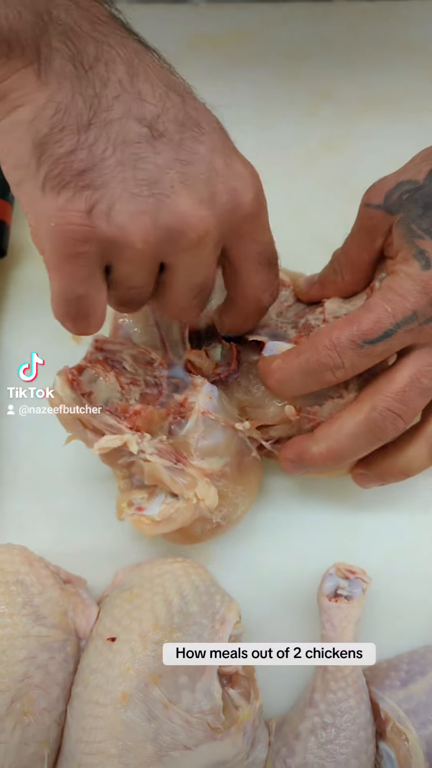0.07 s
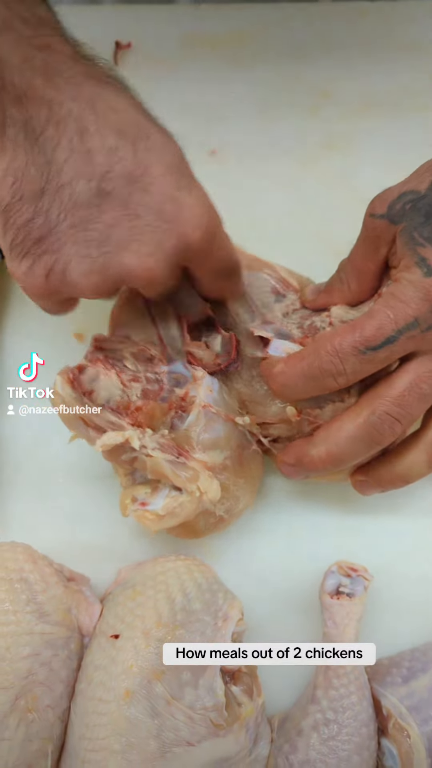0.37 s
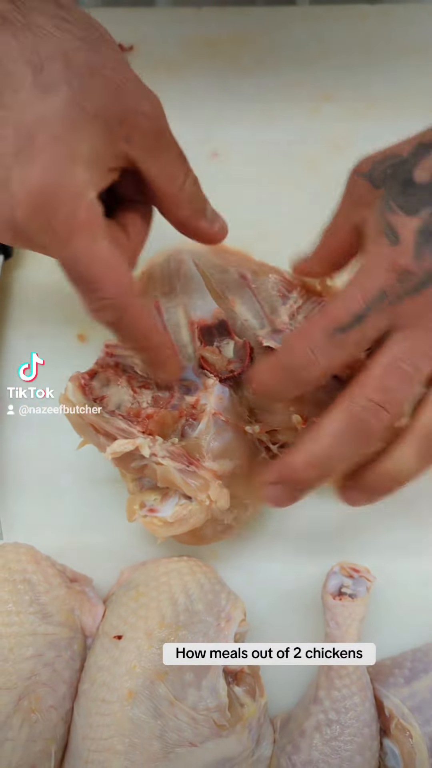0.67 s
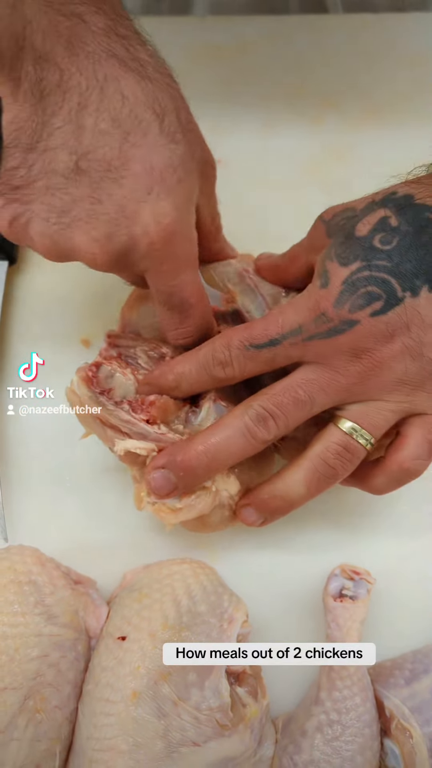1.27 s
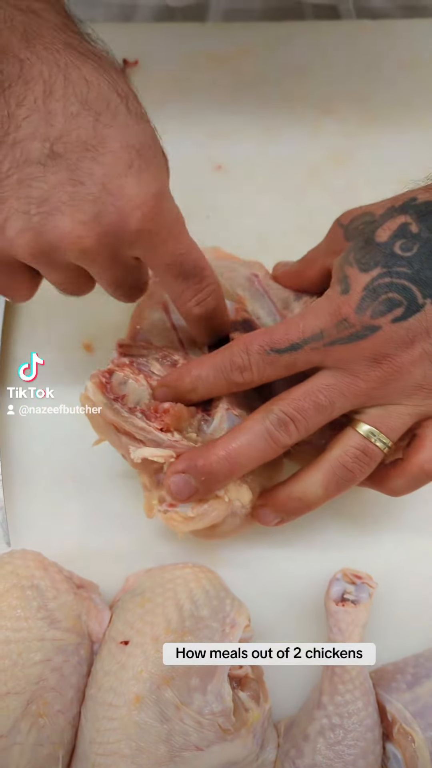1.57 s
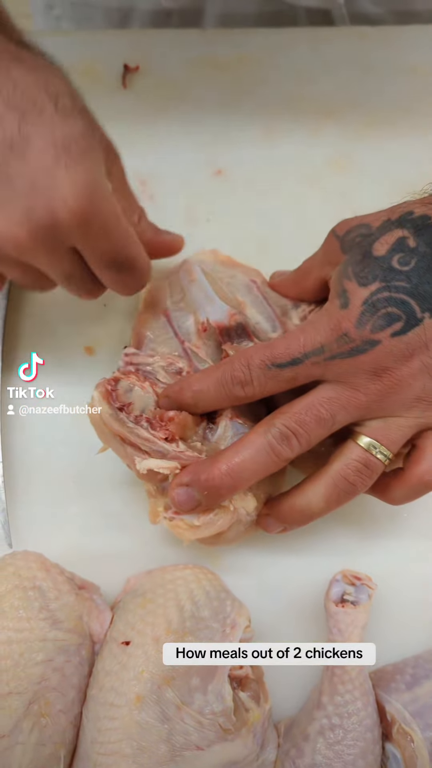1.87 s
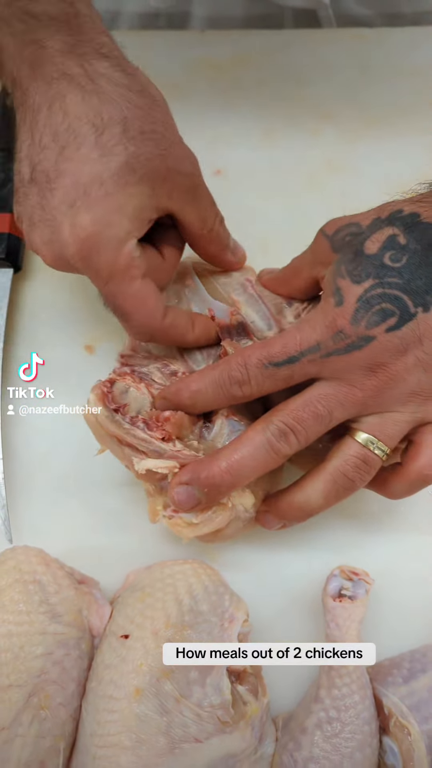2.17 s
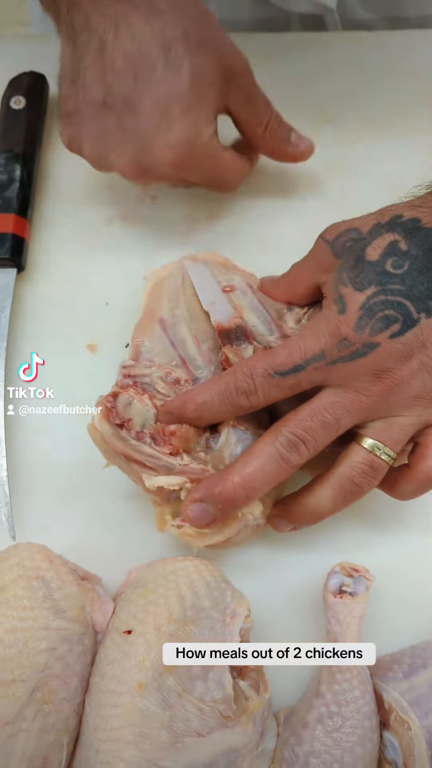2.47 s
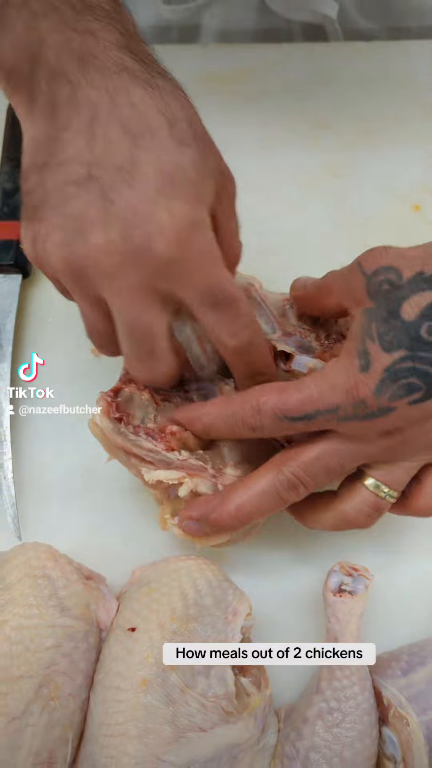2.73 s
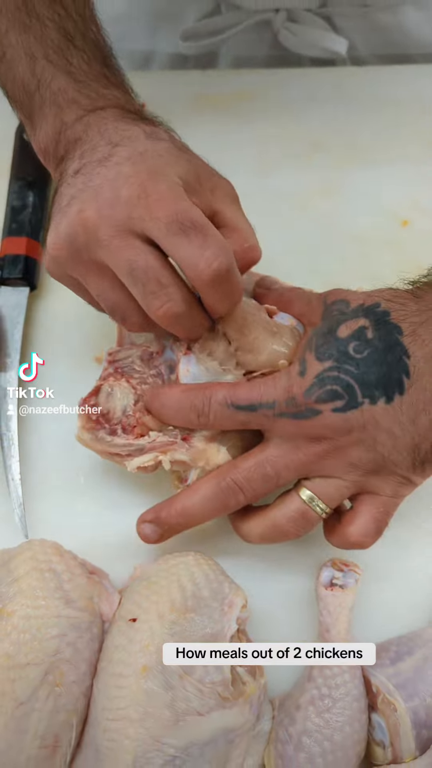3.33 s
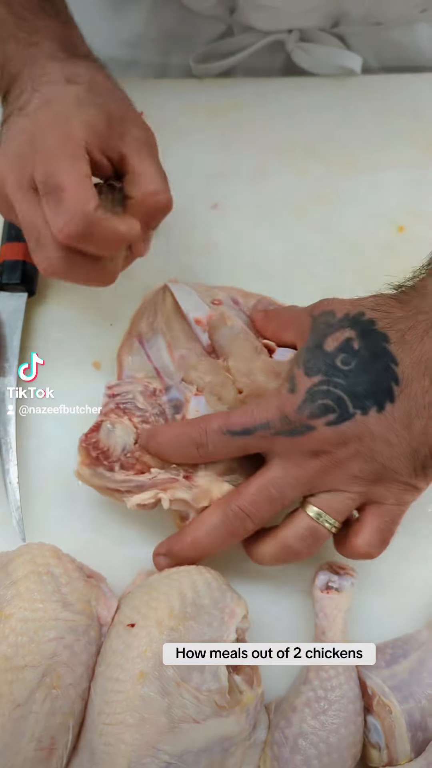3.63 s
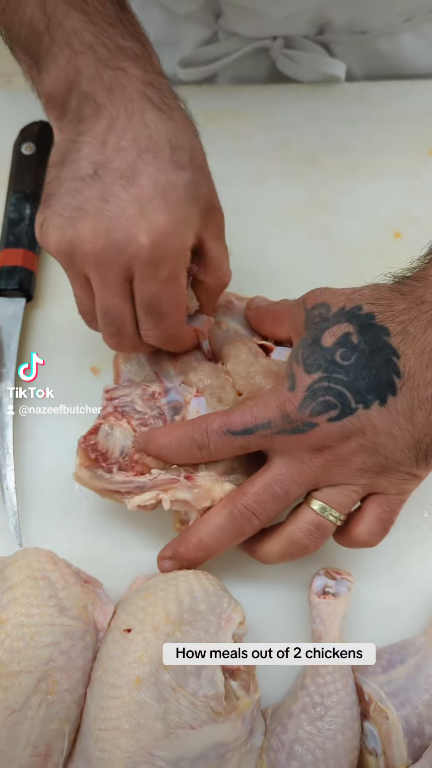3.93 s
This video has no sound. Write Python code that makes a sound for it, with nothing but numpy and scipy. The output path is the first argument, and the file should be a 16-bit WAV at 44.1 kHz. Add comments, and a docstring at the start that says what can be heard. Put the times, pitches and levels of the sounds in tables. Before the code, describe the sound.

Hands pull raw chicken from the bone close by, making scattered wet clicks, sticky snaps and soft cutting board thuds, then a small hollow pop near the end. Kitchen ventilation hisses and hums throughout.

```python
"""Kitchen ventilation hisses over a throbbing motor hum, which swells briefly, and a thin fan whine.
Close by, hands pull the meat of a raw chicken from the bone on a plastic cutting board.
Wet tissue peels in bursts of tiny clicks, juice films snap, palms rub, the board thuds softly;
near the end an air pocket pops. The right microphone port rings in the treble."""
import sys
import numpy as np
from scipy import signal
from scipy.fft import rfft, irfft, next_fast_len
from scipy.io import wavfile
from scipy.ndimage import uniform_filter1d

SR = 44100
rng = np.random.default_rng(int(sys.argv[2]) if len(sys.argv) > 2 else 0)


def store_pcm(level_fs):
    """Save levels as 16-bit WAV."""
    pcm = np.round(np.clip(level_fs, -1, 1) * 32767).astype(np.int16)
    wavfile.write(sys.argv[1], SR, np.atleast_2d(pcm).T)


N = 176400

# ventilation spectrum: f/Hz, level/dB
AIR_SPECTRUM = [(25, -82), (45, -77.5), (65, -71.5), (95, -75), (118, -60.5), (145, -74), (230, -74.5),
                (300, -80), (480, -76.5), (720, -81), (1300, -89.5), (2300, -90), (3300, -96), (4600, -102),
                (5400, -102.5), (6200, -99.5), (6800, -99.5), (7500, -96.5), (8000, -105), (8500, -101),
                (9000, -100), (10800, -105), (12300, -100), (13100, -105.5), (15000, -103.5)]
# left-right coherence of the air noise: f/Hz, coherence/0-1
AIR_COHERENCE = [(60, 0.84), (130, 1), (290, 0.69), (640, 0.39), (1400, 0)]
# narrow bands in the hiss: f/Hz, half width/Hz, level/dB
SIZZLE_BANDS = [(9106, 125, 13.5), (9040, 105, 5.5)]
# motor tones: f/Hz
MOTOR_HZ = [59.06, 108.92, 120.02, 131.12]
# motor tones: level/dB
MOTOR_DB = [-62.5, -53.5, -48.5, -53]
# fan tones: f/Hz, level/dB
FAN_TONES = [(802.1, -62.5), (2326, -68.5), (2546, -69.5), (3268, -69.5), (3967, -69.5), (4393, -73.5),
             (5157, -74), (6137, -73), (7286, -70), (7801, -72), (9197, -62)]
# brief swell of the hum (120 Hz row) and board thuds (other rows): t/s, level/dB, f/Hz, t60/s
BASS_PULSES = [(0.379, -46, 101, 0.087), (0.451, -40, 120, 0.22), (1.101, -30, 204, 0.032),
               (2.425, -27.5, 72, 0.089), (3.497, -38, 82.4, 0.15)]
# hand strokes: centre t/s, half length/s, level/dB
HAND_RUBS = [(0.535, 0.1, -82.5), (.82, .14, -84), (1.517, 0.069, -83.5), (2.424, 0.058, -81),
             (3.173, 0.079, -83.5)]
# rubbing spectrum: f/Hz, level/dB
RUB_SPECTRUM = [(80, -2.5), (200, 4), (550, 3), (1000, -22.5), (3000, -18), (12000, -38)]
# air pocket opening: t/s, level/dB, f/Hz
POCKET_POPS = [(3.454, -37, 960), (3.4645, -35.5, 1260), (3.468, -33, 950), (3.4691, -31, 680),
               (3.4762, -23.5, 705)]
# juice films bursting: t/s, level/dB, f/Hz, t60/s
FILM_SNAPS = [(.305, -56, 12500, .004), (0.378, -31.5, 2980, 0.0045), (0.3955, -35, 5950, 0.0054),
              (.4175, -31.5, 7400, 0.0045), (.713, -37, 13100, .003), (1.203, -47, 6400, .006),
              (1.233, -41, 14000, .003), (1.2573, -36, 6350, 0.0034), (1.2584, -34.5, 7600, 0.0029),
              (1.2587, -44, 13500, .003), (1.262, -50, 7950, .008), (1.284, -45, 7900, .005),
              (1.635, -44, 13500, .003), (1.7619, -24, 3020, 0.0025), (1.7615, -32, 14500, .003),
              (1.763, -43, 6560, .004), (1.769, -56, 8000, 0.0043), (1.853, -44, 12500, .003),
              (2.339, -41, 6500, .002), (2.3395, -45, 13000, .002), (2.351, -46, 7200, .004),
              (2.4165, -35, 9900, .003), (2.435, -34, 9800, .003), (2.912, -40, 13500, .003),
              (3.4963, -37.5, 5900, .0035)]
# tissue peeling: t/s, length/s, level/dB, swell/dB, treble tilt/(dB/oct),
# wet gap resonance f/Hz, its gain/dB, click rate/(1/s)
TISSUE_PEELS = [(0.276, 0.035, -106, -1.5, -3, 7600, 8, 300),
                (0.377, 0.025, -84, 2.5, -8, 6000, 11.5, 3700), (0.401, 0.0092, -84, 4, -6, 7450, 14, 7100),
                (0.41, 0.012, -76.5, 3.5, -6, 7500, 8, 5000), (0.694, 0.02, -103, 4, 6, 13000, 7, 1500),
                (1.101, 0.22, -106, -2, -7, 6500, 2.5, 290), (1.225, 0.012, -88.5, 3, -13, 2700, 8.5, 2600),
                (1.764, 0.014, -102, -4.5, -1, 3540, 9, 3200), (2.346, 0.019, -91.5, 1.5, -7, 6500, 4, 840),
                (2.349, 0.038, -90.5, 4, 1.5, 14000, 6, 4100),
                (2.385, 0.023, -98.5, -0.5, 1, 6500, 7, 1000),
                (2.409, 0.009, -88, 3.5, 6.5, 6460, 15, 5700),
                (2.418, 0.0286, -94, 0.5, -5, 6850, 4.5, 1000), (2.893, 0.19, -105, -0.5, -6, 6500, 8, 400),
                (3.256, 0.021, -101, -2, -6, 12000, 2, 500), (3.453, 0.015, -76, 2.5, -4.5, 2460, 4, 11300),
                (3.4654, 0.0065, -74, 1.5, -9, 8200, 7.5, 12000),
                (3.471, 0.0068, -82.5, -3.5, -6, 8150, -5, 10000)]
# peeling spectrum: f/Hz, level/dB
PEEL_SPECTRUM = [(200, -13), (700, 1), (1500, -12.5), (1950, -1), (2600, -0.5), (3300, -0.5), (4400, -6.5),
                 (4900, -4), (5400, -8.5), (6000, -3), (6700, -5), (7500, -0.5), (9000, -5), (10200, 8.5),
                 (11200, 1), (12600, 4), (15000, 7)]
# right microphone port relative to the left: f/Hz, level/dB
PORT_RESPONSE = [(120, 0), (280, 3), (480, -2), (720, 0), (1300, 2), (3200, 1), (4600, 7), (6200, 10),
                 (7400, 12.5), (8800, 16), (9200, 14), (9600, 8), (10150, 4), (10700, -8), (11500, -8),
                 (12200, -1), (15000, 0)]


def undb(db):
    """Decibels to gain."""
    return 10 ** (np.asarray(db) / 20)


def curve(points, f):
    """Interpolate on a log-frequency axis."""
    hz, value = np.array(points, float).T
    return np.interp(np.log(f + 1), np.log(hz), value)


def rolloff_db(ratio, order):
    """Butterworth slope: ratio f/cutoff for low-pass, cutoff/f for high-pass."""
    return -10 * np.log10(1 + ratio ** (2 * order))


def colour(x, db_at):
    """Minimum-phase filter with gain db_at(f)."""
    n = 2 * next_fast_len(x.shape[-1] // 2 + 2048)
    f = np.arange(n // 2 + 1) * SR / n
    cepstrum = irfft(np.log(undb(db_at(f))), n)
    cepstrum[1:n // 2] *= 2
    cepstrum[n // 2 + 1:] = 0
    return irfft(rfft(x, n) * np.exp(rfft(cepstrum)), n)[..., :x.shape[-1]]


def white(shape):
    """White noise, unit power per Hz."""
    return rng.standard_normal(shape) * np.sqrt(SR / 2)


def walk(rate_hz):
    """Smooth random drift, unit spread."""
    hold = int(SR / rate_hz)
    steps = np.repeat(rng.standard_normal(N // hold + 1), hold)
    drift = uniform_filter1d(uniform_filter1d(steps, hold), hold)[:N]
    return drift / drift.std()


def add(out, start_s, x):
    """Mix x in at start_s."""
    i = max(int(start_s * SR), 0)
    out[..., i:i + x.shape[-1]] += x[..., :N - i]


def ring(hz, t60_s):
    """One damped mode."""
    t = np.arange(SR // 4) / SR
    return np.sin(2 * np.pi * hz * t) * np.exp(-np.log(1000) * t / t60_s)


def ventilation(flicker_db=1.7, flicker_hz=32):
    """Steady air noise, coherent in the bass, with a narrow, flickering treble sizzle."""
    coherence = lambda f: np.clip(curve(AIR_COHERENCE, f), 0, .995)
    mid = colour(white(N), lambda f: 10 * np.log10((1 + coherence(f)) / 2))
    side = colour(white(N), lambda f: 10 * np.log10((1 - coherence(f)) / 2))
    air = np.array([mid + side, mid - side])
    band_power = lambda f: sum(undb(db) ** 2 / (1 + ((f - hz) / width_hz) ** 2 / 2) ** 2
                               for hz, width_hz, db in SIZZLE_BANDS)
    sizzle = colour(white((2, N)), lambda f: 10 * np.log10(band_power(f)))
    sizzle *= undb(flicker_db * walk(flicker_hz))
    return colour(air + sizzle, lambda f: curve(AIR_SPECTRUM, f))


def motor_hum(waver_db=1.97, in_phase_s=.013):
    """Close low tones beat into a throb."""
    t = np.arange(N) / SR
    hum = np.zeros(N)
    for hz, db in zip(MOTOR_HZ, MOTOR_DB):
        rms = undb(db + waver_db * walk(rate_hz=2.37))
        hum += np.sqrt(2) * rms * np.cos(2 * np.pi * hz * (t - in_phase_s))
    return hum


def fan_whine(gain_db=-3.5, waver_db=3, wander_hz=7):
    """Thin fan tones waver in level and pitch, independently per side."""
    out = np.zeros((2, N))
    for channel in out:
        for hz, db in FAN_TONES:
            rms = undb(db + gain_db - curve(PORT_RESPONSE, hz) / 2 + waver_db * walk(rate_hz=28.2))
            phase = 2 * np.pi * np.cumsum(hz + wander_hz * walk(rate_hz=45)) / SR
            channel += np.sqrt(2) * rms * np.sin(phase)
    return out


def kitchen(x, t60_s=.5, predelay_s=.0037):
    """Direct sound plus a short tail from hard walls."""
    t = np.arange(SR // 2) / SR
    tail = rng.standard_normal((2, len(t))) * np.exp(-np.log(1000) * t / t60_s) * (t > predelay_s)
    tail /= np.sqrt(np.sum(tail[0] ** 2))
    tail = colour(tail, lambda f: curve([(7000, -9), (14000, -13)], f))  # f/Hz, level/dB
    return x + signal.fftconvolve(x, tail, axes=1)[:, :N]


def bass_pulses(rise_s=.0015, cutoff_hz=306):
    """Damped low tones: one brief swell of the 120 Hz hum; the rest, soft flesh pushing the board."""
    out, t = np.zeros(N), np.arange(SR // 4) / SR
    for start_s, db, hz, t60_s in BASS_PULSES:
        add(out, start_s, undb(db) * ring(hz, t60_s) * (1 - np.exp(-t / rise_s)))
    return signal.sosfilt(signal.butter(2, cutoff_hz, fs=SR, output="sos"), out)


def hand_rubbing():
    """Palms and fingers slide on the meat in dull, soft swells."""
    t = np.arange(N) / SR
    pressure = sum(undb(db) * np.exp(-((t - centre_s) / half_s) ** 2)
                   for centre_s, half_s, db in HAND_RUBS)
    return colour(white(N) * pressure, lambda f: curve(RUB_SPECTRUM, f))


def pocket_pops(t60_s=.02, right_db=-5):
    """An air pocket rings hollow, lower and louder as it opens, left of centre."""
    out = np.zeros(N)
    for start_s, db, hz in POCKET_POPS:
        add(out, start_s, undb(db) * ring(hz, t60_s))
    return np.array([out, out * undb(right_db)])


def film_snaps(fizz_db=-25, fizz_decay_s=.0035):
    """Each bursting juice film rings briefly, kept alive by a fizz of droplets."""
    out, t = np.zeros((2, N)), np.arange(SR // 20) / SR
    impulse = t == 0
    for start_s, db, hz, t60_s in FILM_SNAPS:
        droplets = undb(fizz_db) * rng.standard_normal((2, len(t))) * np.exp(-t / fizz_decay_s)
        film = colour(ring(hz, t60_s), lambda f: rolloff_db(.65 * hz / (f + 20), order=3))
        add(out, start_s, undb(db) * signal.fftconvolve(impulse + droplets, film[None], axes=1))
    return out


def tissue_peeling(spread_db=3, split_hz=2400, rise_s=.0015, release_s=.002, tilt_from_hz=6500):
    """Tissue lets go in tiny clicks that ring the wet gap: sparse at a touch, a rush in a hard pull."""
    out, t = np.zeros((2, N)), np.arange(SR // 4) / SR
    shape = (3, len(t))  # shared, left, right
    for start_s, length_s, db, swell_db, tilt_db_oct, gap_hz, gap_db, clicks_per_s in TISSUE_PEELS:
        hits = rng.random(shape) < clicks_per_s / SR
        clicks = hits * rng.choice([-1, 1], shape) * undb(spread_db * rng.standard_normal(shape))
        shared_lows = colour(clicks[0], lambda f: rolloff_db(f / split_hz, order=1))
        stereo_highs = colour(clicks[1:], lambda f: rolloff_db(split_hz / (f + 20), order=1))
        crackle = (shared_lows + stereo_highs) / clicks.std() * np.sqrt(SR / 2)
        swell = undb(swell_db * (np.minimum(t / length_s, 1) - 2.5))
        gate = np.minimum(t / rise_s, 1) * np.exp(-np.maximum(t - length_s, 0) / release_s)
        resonance_db = lambda f: gap_db / (1 + ((f / gap_hz - 1) / .3) ** 2)  # half width 30 %
        treble_db = lambda f: tilt_db_oct * np.log2(np.maximum(f / tilt_from_hz, 1))
        spectrum_db = lambda f: db + curve(PEEL_SPECTRUM, f) + resonance_db(f) + treble_db(f)
        add(out, start_s, colour(crackle * swell * gate, spectrum_db))
    return out


def scene():
    """Handling in the kitchen over air and motors; the bass pulses stay dry."""
    background = ventilation() + motor_hum() + fan_whine()
    handling = tissue_peeling() + film_snaps() + pocket_pops() + hand_rubbing()
    return background + kitchen(handling) + bass_pulses()


def record(dry, low_cut_hz=65, high_cut_hz=15400):
    """The right port colours its channel; deep bass and top are cut."""
    right = colour(dry[1], lambda f: curve(PORT_RESPONSE, f))
    ports = colour(np.array([dry[0], right]), lambda f: rolloff_db(low_cut_hz / (f + 10), order=3))
    return signal.sosfilt(signal.ellip(10, .2, 80, high_cut_hz, fs=SR, output="sos"), ports)


dry = scene()
out = record(dry)
store_pcm(out)
```